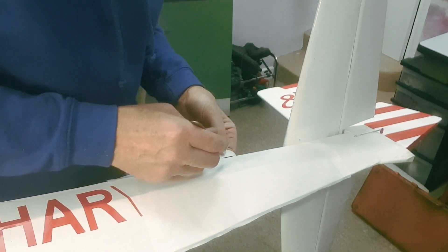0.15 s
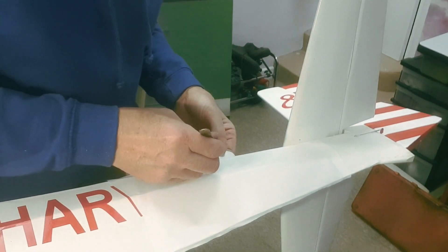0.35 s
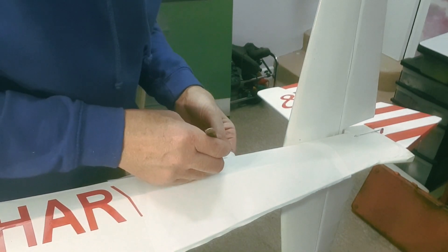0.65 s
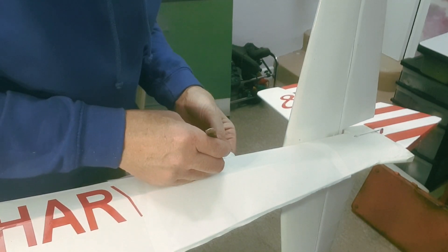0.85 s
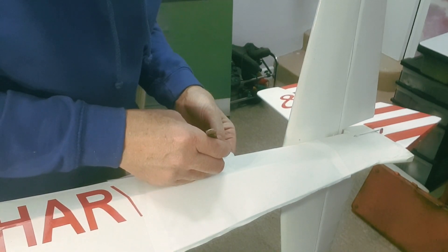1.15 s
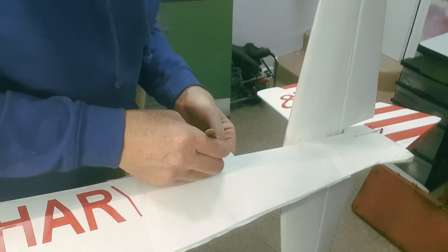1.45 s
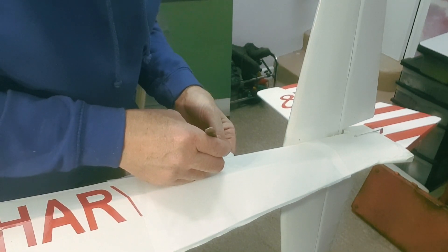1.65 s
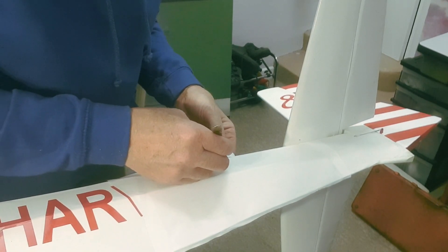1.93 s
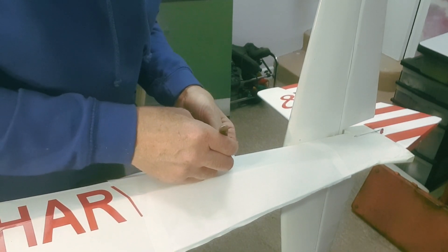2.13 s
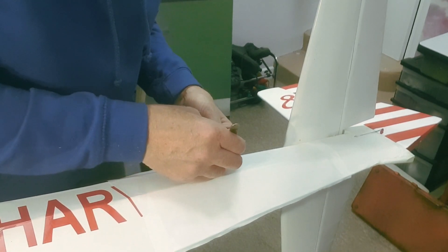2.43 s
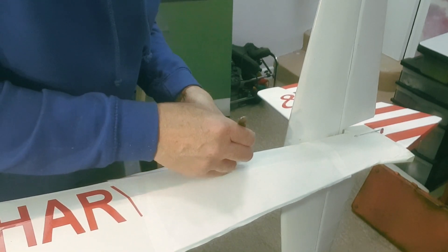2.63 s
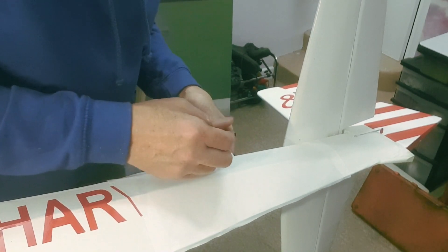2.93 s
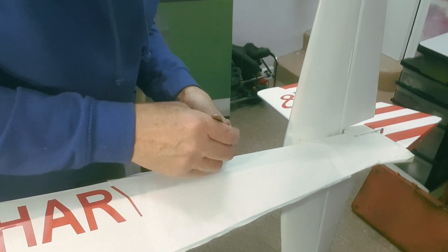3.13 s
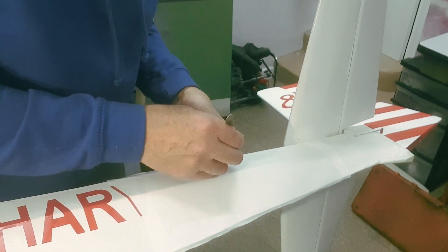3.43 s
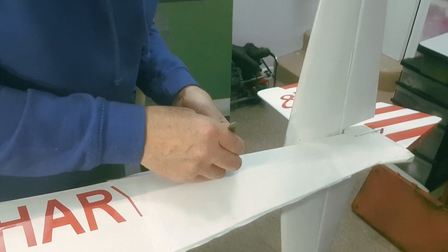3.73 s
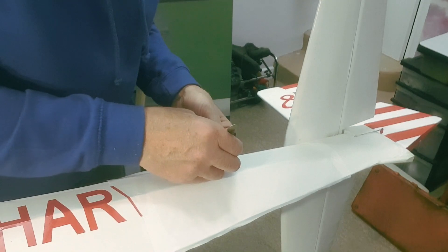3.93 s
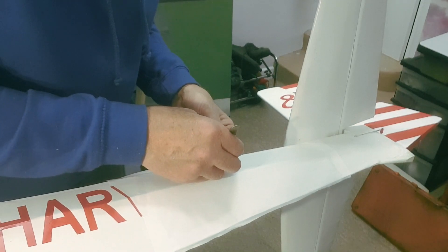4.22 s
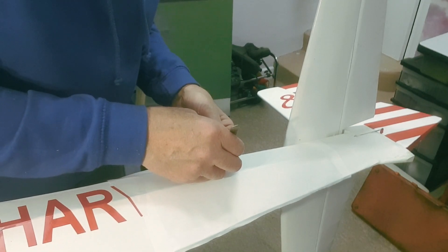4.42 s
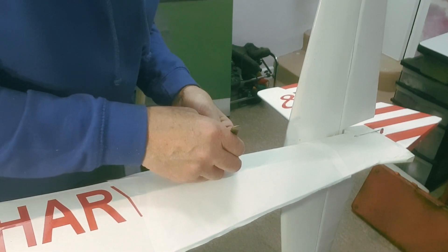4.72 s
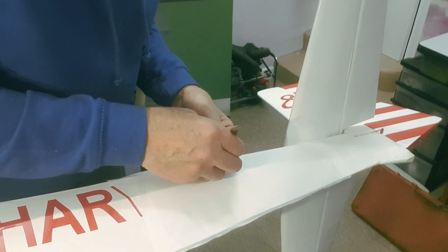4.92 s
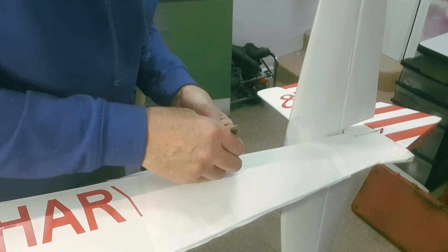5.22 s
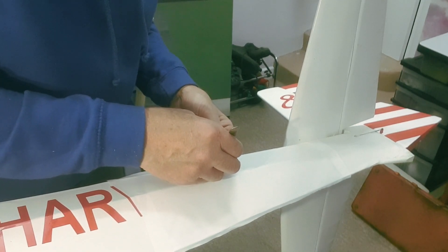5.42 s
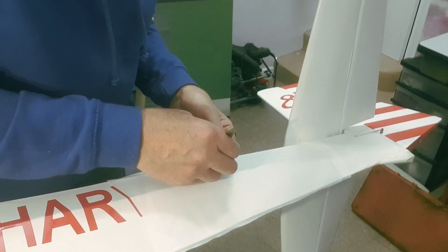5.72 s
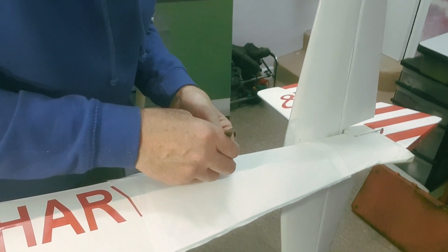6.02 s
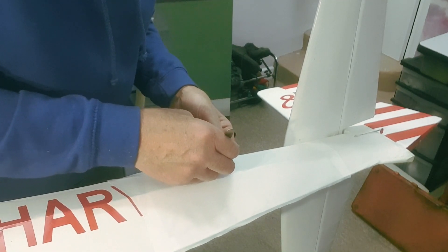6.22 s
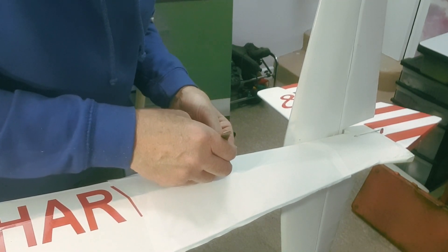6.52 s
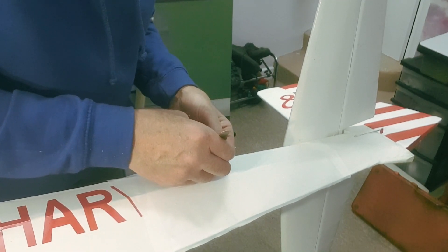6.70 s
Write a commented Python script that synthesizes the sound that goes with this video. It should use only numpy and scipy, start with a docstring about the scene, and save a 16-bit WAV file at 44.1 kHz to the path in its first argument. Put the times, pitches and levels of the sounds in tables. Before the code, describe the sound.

Hands faintly brush and nudge a hollow fabric-covered panel, and a small tool clicks lightly, over a constant low hum.

```python
"""Mains hum fills a quiet workshop, over a low rumble, microphone hiss and a thin electronic whine.
Hands work on the fabric-covered tail of a model aircraft: fingers rub the covering in countless tiny
slips and nudge the hollow, drum-like panel into ringing. Later a small tool clicks and scratches on the
stiff edge. The small room answers each touch briefly."""
import sys
import numpy as np
from scipy import signal
from scipy.fft import rfft, irfft, next_fast_len
from scipy.io import wavfile

SR = 44100
rng = np.random.default_rng(int(sys.argv[2]) if len(sys.argv) > 2 else 0)


def to_wav(sig):
    """Store sig (one row per channel, or 1-D mono) as 16-bit WAV at the path in sys.argv[1].

    Samples outside -1..1 are clipped; the rate is SR.
    """
    pcm = np.clip(np.atleast_2d(sig), -1, 1) * 32767
    pcm = np.round(pcm).astype(np.int16)
    wavfile.write(sys.argv[1], SR, pcm.T)  # frames by channels


N = 302526
TIME_S = np.arange(N) / SR


def undb(db):
    """Decibels to gain."""
    return 10 ** (np.asarray(db) / 20)


def level(x, db):
    """Scale to an rms level."""
    return x * undb(db) / np.sqrt(np.mean(x ** 2))


def pan(db):
    """Stereo gains for a left-minus-right level."""
    return undb(np.array([[db], [-db]]) / 2)


def colour(x, points):
    """Minimum-phase filter through (freq_hz, gain_db) points."""
    size = next_fast_len(2 * x.shape[-1], True) // 2 * 2
    hz, db = np.transpose(points)
    bins_hz = np.arange(size // 2 + 1) * SR / size
    gain = undb(np.interp(np.log(bins_hz + 1), np.log(hz), db))
    cepstrum = irfft(np.log(gain))[:size // 2]
    cepstrum[1:] *= 2
    return irfft(rfft(x, size) * np.exp(rfft(cepstrum, size)))[..., :x.shape[-1]]


def ring(force, modes):
    """A body's modes driven by a force; neighbours swing in opposite senses."""
    return sum((-1) ** k * undb(db) * signal.lfilter(*signal.iirpeak(hz, hz / width_hz, fs=SR), force)
               for k, (hz, width_hz, db) in enumerate(modes))


def phase_drift(shape, width_hz):
    """Random walk of phase that widens a tone's line."""
    return np.cumsum(rng.standard_normal(shape), axis=-1) * np.sqrt(2 * np.pi * width_hz / SR)


def add(track, start_s, sound, db):
    """Mix a sound in, at the level of its energy spread over 10 ms."""
    start = int(start_s * SR)
    part = track[start:start + len(sound)]
    part += undb(db) * sound[:len(part)] / np.sqrt(np.sum(sound ** 2) / (SR / 100))


def room(x, wet_db, bounce_gain, bounce_s=0.001636, t60_s=0.28):
    """Direct sound, a quick bounce off the wing surface, then a short diffuse decay on each side."""
    t = TIME_S[:SR // 2]
    build_up = 1 - np.exp(-t / 0.0059)
    response = rng.standard_normal((2, len(t))) * undb(-60 * t / t60_s) * build_up
    response *= undb(wet_db) / np.sqrt(np.sum(response ** 2) / 2)
    response[:, 0] += 1
    response[:, int(bounce_s * SR)] += bounce_gain
    return signal.fftconvolve(x[None], response, axes=1)[:, :N]


# hum partials: harmonic, level_db, pan_db
HUM_PARTIALS = [(1, -42, 0.8), (2, -59.5, -3), (3, -77.5, 7.5), (4, -88.5, -11)]
HUM_HZ = 100.126


def hum():
    """Iron buzzes at twice the mains frequency."""
    track = np.zeros((2, N))
    for harmonic, db, pan_db in HUM_PARTIALS:
        phase = 2 * np.pi * harmonic * HUM_HZ * TIME_S + rng.uniform(0, 2 * np.pi)
        track += pan(pan_db) * level(np.cos(phase), db)
    return track


# whine centre and sidebands: offset_harmonics, level_db
WHINE_LINES = [(-2, -90), (-1, -85), (0, -79.5), (1, -80.5)]


def whine(centre_hz=15069):
    """A faint, unsteady electronic tone, modulated by the mains ripple."""
    drift = phase_drift((2, N), width_hz=8)
    track = np.zeros((2, N))
    for offset, db in WHINE_LINES:
        phase = 2 * np.pi * (centre_hz + offset * HUM_HZ) * TIME_S + rng.uniform(0, 2 * np.pi)
        track += level(np.cos(phase + drift), db)
    return track


# rumble common to both sides: freq_hz, density_db
RUMBLE_MID_SPECTRUM = [(25, -16), (39, -16), (47, 2), (75, 0.5), (120, -3), (160, -6), (240, -12),
                       (300, -13), (370, -22), (500, -29.5), (900, -36.5), (3000, -64)]
# rumble opposed between the sides: freq_hz, density_db
RUMBLE_SIDE_SPECTRUM = [(25, -20), (40, -29), (55, -1.5), (110, -1.5), (170, -11.5), (290, -10.5),
                        (400, -23), (600, -30), (1200, -37.5)]


def rumble():
    """Low room noise, much alike on both sides."""
    mid = level(colour(rng.standard_normal(N), RUMBLE_MID_SPECTRUM), -59.5)
    side = level(colour(rng.standard_normal(N), RUMBLE_SIDE_SPECTRUM), -65)
    return np.array([mid + side, mid - side])


# microphone self-noise: freq_hz, density_db
HISS_SPECTRUM = [(300, -2.5), (1500, -2), (3500, -6), (5200, -7.5), (5900, -8.5), (6450, -8), (7400, -7.5),
                 (9400, -3), (10500, -2), (11900, 1), (14400, 3.5), (15050, 9.5), (15500, 3)]


def hiss():
    """Each microphone adds its own noise."""
    return pan(-0.074) * level(colour(rng.standard_normal((2, N)), HISS_SPECTRUM), -62.5)


def friction(slips_per_s, spread_db):
    """Countless tiny slips of uneven size."""
    slips = rng.random(N) < slips_per_s / SR
    return slips * rng.standard_normal(N) * undb(spread_db * np.minimum(rng.exponential(size=N), 4))


# fingertip friction: freq_hz, density_db
SLIDE_SPECTRUM = [(800, -20.5), (2000, -10), (2850, -9.5), (3500, -8), (4500, -6.5), (5000, 1.5),
                  (5800, -1), (6700, -4), (8000, -10.5), (10000, -10), (14000, -24)]
# hand and sleeve friction: freq_hz, density_db
BRUSH_SPECTRUM = [(300, 2), (600, -5.5), (1100, 0.5), (1700, -9.5), (2800, -0.5), (4000, -25.5),
                  (7000, -5.5)]
# hollow covered panel: pitch_hz, width_hz, gain_db
PANEL_MODES = [(219.5, 14.5, 8), (280, 22.6, -0.5), (307, 21, 4.5), (375, 80, -4), (478, 42, -7),
               (625, 81, -12.5), (1000, 340, -20.5)]
# strokes over the covering: start_s, length_s, slide_db, brush_db
HAND_STROKES = [(0.31, 0.032, -79, -87), (1.32, 0.028, -77, -88), (1.558, 0.056, -91, -77),
                (1.812, 0.17, -83, -76.5), (2.026, 0.077, -81, -75.5), (2.106, 0.16, -82, -72.5),
                (2.298, 0.15, -73, -71), (2.465, 0.11, -71, -84), (2.571, 0.065, -69.5, -75.5),
                (3.05, 0.1, -86.5, -100), (3.316, 0.031, -79.5, -90), (3.547, .07, -83, -79),
                (3.74, 0.063, -81.5, -82), (4.306, 0.034, -71.5, -88), (4.587, 0.026, -76, -74),
                (4.932, 0.22, -85.5, -81), (5.204, 0.052, -71, -68), (5.308, 0.14, -77.5, -77),
                (5.505, 0.045, -73.5, -69), (6.308, 0.039, -78.5, -82), (6.41, 0.11, -79.5, -72.5),
                (6.687, 0.21, -78.5, -71.5)]


def rubbing(attack_s=0.014, release_s=0.024, swell_db_per_s=4):
    """Fingertips hiss over the covering; hand and sleeve brush along, and their drag drones the panel."""
    slide, brush = np.zeros((2, N))
    for start_s, length_s, slide_db, brush_db in HAND_STROKES:
        t = TIME_S - start_s
        contact = np.clip(t / attack_s, 0, 1) * np.exp(-np.maximum(t - length_s, 0) / release_s)
        swell_db = swell_db_per_s * np.clip(t, 0, length_s)  # the fingertips gather speed
        slide += contact * undb(slide_db + swell_db)
        brush += contact * undb(brush_db)
    tips = slide * level(colour(friction(slips_per_s=3500, spread_db=2.0), SLIDE_SPECTRUM), -0.95)
    sleeve = brush * level(colour(friction(slips_per_s=5000, spread_db=7.5), BRUSH_SPECTRUM), -3)
    drone = brush * level(ring(friction(slips_per_s=1100, spread_db=-3.0), PANEL_MODES), 7.65)
    rustle = pan(0.94) * room(tips + sleeve, wet_db=5.5, bounce_gain=0.12)
    return rustle + room(drone, wet_db=-3.5, bounce_gain=0.074)


# pushes on the panel: start_s, level_db, pitch_hz, rise_s
FINGER_NUDGES = [(1.991, -52.5, 200.4, 0.015), (2.465, -45, 280, 0.012), (2.505, -47, 372, 0.014),
                 (2.669, -57, 1055, .004), (3.037, -61.5, 300, 0.0044), (3.547, -48.5, 306, 0.0077),
                 (3.573, -47, 285, 0.0083), (3.583, -62, 613, 0.0079), (3.775, -52.5, 287, 0.023),
                 (4.652, -62.5, 280, 0.0084), (5.208, -52.5, 296, 0.0042), (5.233, -56, 594, 0.0095),
                 (5.251, -54, 242, .007), (5.266, -55.5, 374, 0.0043), (5.409, -49, 217, 0.0068),
                 (5.429, -56, 400, 0.0094), (5.539, -68, 249, .008), (5.564, -53.5, 344, 0.011),
                 (6.433, -54.5, 251, .014), (6.753, -53.5, 280, .008), (6.825, -53, 317, .008)]


def nudges(grit_db=9):
    """Each soft push is an uneven shudder of skin on fabric that swells, fades and rings the panel."""
    track, t = np.zeros(N), TIME_S[:SR // 5]
    for start_s, db, pitch_hz, rise_s in FINGER_NUDGES:
        pressure = t * np.exp(-t / rise_s)
        shudder = np.sin(2 * np.pi * pitch_hz * t + phase_drift(len(t), width_hz=45))
        grit = undb(grit_db) * rng.standard_normal(len(t))
        add(track, start_s - 0.005, ring(pressure * (shudder + grit), PANEL_MODES), db + 1)
    return pan(0.019) * room(track, wet_db=-2.0, bounce_gain=0.07)


def disperse(x, lag_s):
    """Bending waves carry the treble ahead of the bass, spreading a click slightly."""
    hz = np.arange(len(x) // 2 + 1) * SR / len(x)
    return irfft(rfft(x) * np.exp(-2j * np.pi * lag_s * hz * (1 - hz / SR)), len(x))


# dry crack of the tool: freq_hz, density_db
CRACK_SPECTRUM = [(600, -24.5), (1200, -12), (2000, -7), (2450, -3), (4400, 0), (6300, -7), (8000, -1),
                  (11000, -8), (15500, -8)]
# stiff edge: pitch_hz, width_hz, gain_db
EDGE_MODES = [(1100, 114, -5.5), (1450, 520, -2.5), (1700, 270, 3.5), (1880, 70, 4.5), (2250, 270, 3.5),
              (2360, 140, 9.5), (2640, 110, -1), (2860, 230, 4), (3340, 250, -18), (4820, 120, 9.5),
              (6170, 380, 2.5)]
# tool clicks and scratches: start_s, level_db, cutoff_hz, scrape_decay_s, edge_db
TOOL_CLICKS = [(4.2094, -50, 11500, 0.0054, -27), (4.799, -70, 3400, .0015, 5),
               (4.8085, -51.5, 2650, 0.0011, 4.5), (5.2299, -72, 4500, 0.0093, 13),
               (5.2514, -67.5, 12000, 0.012, -15), (5.3835, -72.5, 3500, 0.012, 1),
               (5.5236, -72, 3800, 0.015, -13), (5.6276, -72, 7500, 0.0058, 6),
               (6.4248, -67.5, 8000, 0.04, -7), (6.7709, -58, 12000, .004, -12),
               (6.7857, -70, 10000, 0.029, -21), (6.83, -73, 7000, .012, -12),
               (6.855, -60.5, 6500, .009, -10)]


def clicks(scrape_db=-23, thud_db=-1):
    """The tool slips off the edge: a dry crack, a tiny scrape, the edge's ring and a panel thud."""
    track, t = np.zeros(N), TIME_S[:SR // 5]
    impulse = t == 0
    for start_s, db, cutoff_hz, scrape_decay_s, edge_db in TOOL_CLICKS:
        scrape = undb(scrape_db) * np.exp(-t / scrape_decay_s) * rng.standard_normal(len(t))
        lowpass = signal.butter(2, cutoff_hz, fs=SR)  # a softer contact is duller
        force = signal.lfilter(*lowpass, impulse + scrape)
        crack = colour(force, CRACK_SPECTRUM)
        edge = undb(edge_db) * ring(force, EDGE_MODES)
        thud = undb(thud_db) * ring(force, PANEL_MODES)
        add(track, start_s - 0.0008, disperse(crack + edge + thud, lag_s=0.001073), db)
    return pan(1.7) * room(track, wet_db=6.5, bounce_gain=0.07, bounce_s=0.0039)


def scene():
    """Hand work over the steady hum of the workshop."""
    return hum() + whine() + rumble() + hiss() + rubbing() + nudges() + clicks()


# microphone port response: freq_hz, gain_db
PORT_DIP = [(6700, 0), (7200, -7.5), (8400, -12), (9500, -7), (11000, 0)]


def record(dry, cutoff_hz=15740):
    """The microphone port hollows out a treble band; the recorder cuts the top steeply."""
    lowpass = signal.ellip(12, 0.1, 80, cutoff_hz, fs=SR, output="sos")
    return signal.sosfilt(lowpass, colour(dry, PORT_DIP))


dry = scene()
out = record(dry)
to_wav(out)
```